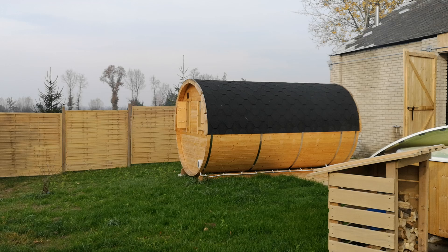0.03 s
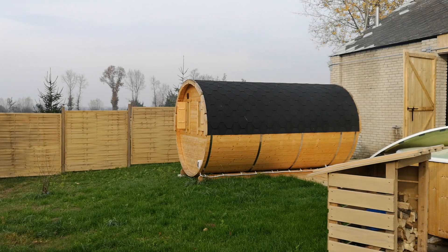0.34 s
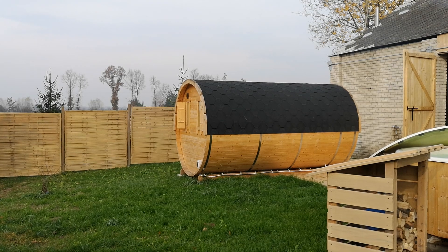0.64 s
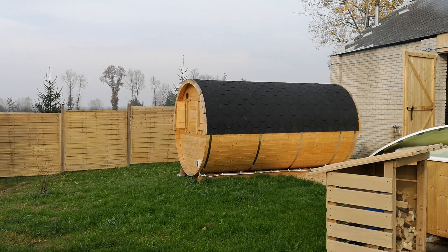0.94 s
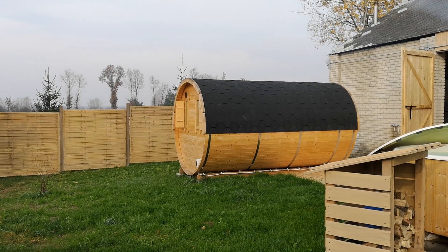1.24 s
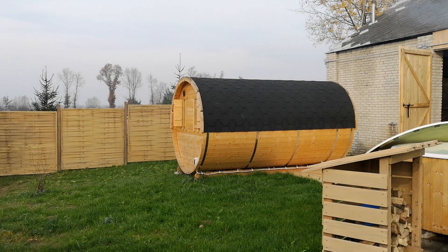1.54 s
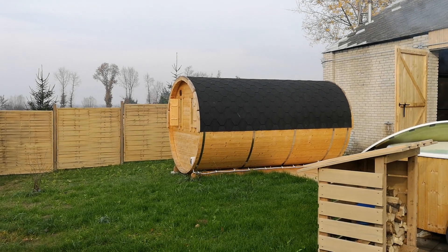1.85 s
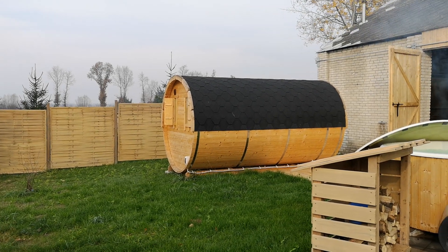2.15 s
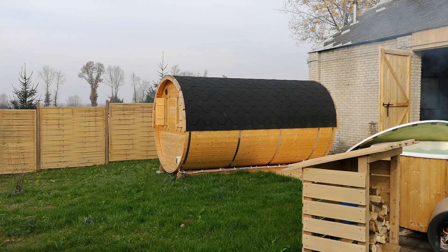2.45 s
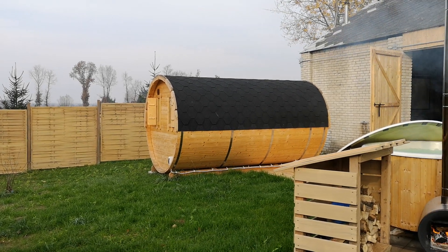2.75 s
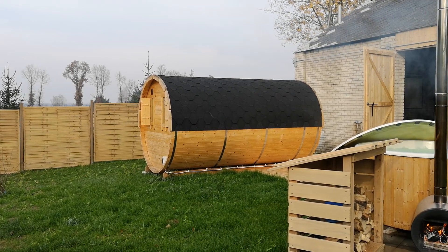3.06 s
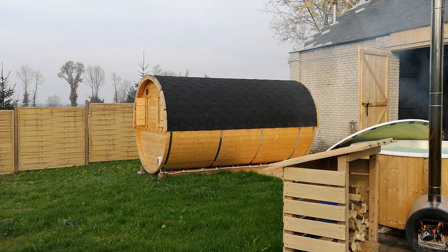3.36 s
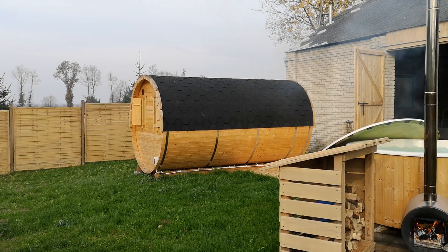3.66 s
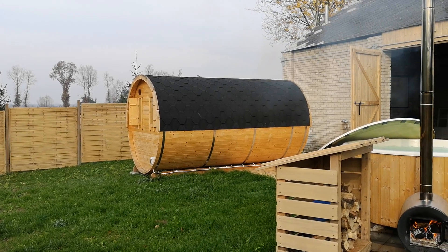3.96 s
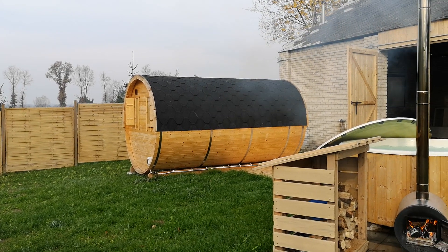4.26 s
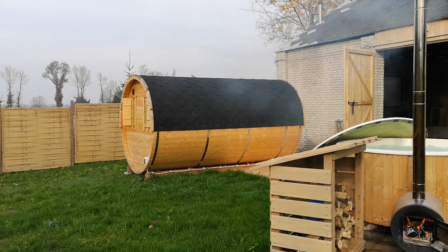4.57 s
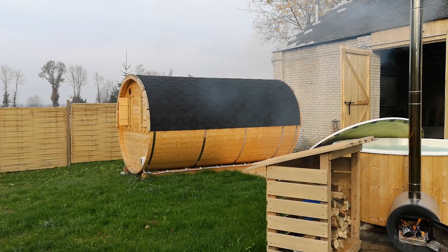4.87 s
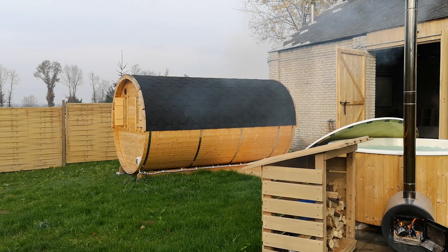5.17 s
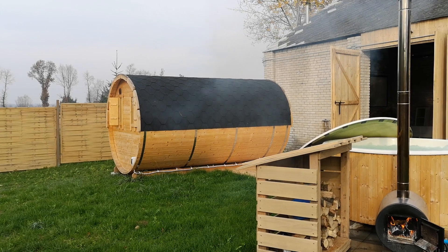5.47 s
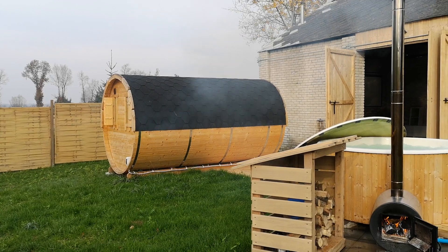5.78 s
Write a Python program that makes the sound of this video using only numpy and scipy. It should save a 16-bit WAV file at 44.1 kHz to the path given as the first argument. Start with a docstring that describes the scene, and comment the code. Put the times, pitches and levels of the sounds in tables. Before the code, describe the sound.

Bubbling water rumbles over a steady pump hum outdoors, with occasional small pops from a wood-burning stove.

```python
"""In a garden, a wood-fired hot tub runs a few metres off to the right.
Its pump hums and whines. Churned water and big pockets of air make the tub rumble in surges,
while small bubbles break and hiss at the surface. In the open stove, pockets of steam make the
logs tick and pop, one log splits, and the barn wall and the fence answer with echoes."""
import sys
import numpy as np
from scipy import signal
from scipy.fft import rfft, irfft
from scipy.io import wavfile
from scipy.ndimage import uniform_filter1d, map_coordinates

SR = 44100
rng = np.random.default_rng(int(sys.argv[2]) if len(sys.argv) > 2 else 0)


def unload_wav(signal):
    """Save mono or channel-first audio to the path in sys.argv[1] as 16-bit WAV at rate SR, clipped to [-1, 1]."""
    wavfile.write(
        sys.argv[1],
        SR,
        np.round(np.clip(np.atleast_2d(signal).T, -1, 1) * 32767).astype(np.int16),
    )


N = 257544
TIME = np.arange(N) / SR
FREQS = np.maximum(np.fft.rfftfreq(N, 1 / SR), 1)


def from_db(db):
    """Turn decibels into a number to multiply by."""
    return 10 ** (np.asarray(db) / 20)


def rms_one(x):
    """Scale a signal so that its average size (rms) is 1."""
    return x / np.sqrt(np.mean(x ** 2) + 1e-20)


def at_hz(points):
    """Join a table's points into a curve with a value at every frequency."""
    hz, value = np.transpose(points)
    return np.interp(np.log(FREQS), np.log(hz), value)


def drift(rate_hz):
    """A random wobble of size 1, mostly slower than the given rate."""
    return rms_one(irfft(rfft(rng.standard_normal(N)) / (1 + (FREQS / rate_hz) ** 2), N))


def resonance(hz, width_hz):
    """A hump of height 1 around one frequency."""
    return 1 / (1 + (2 * (FREQS - hz) / width_hz) ** 2)


def band_pass(x, edges_hz):
    """Keep the sound between a low and a high frequency."""
    return signal.sosfilt(signal.butter(2, edges_hz, "band", fs=SR, output="sos"), x)


def colour(x, tone, modes):
    """Give a noise a broad tone with resonances on top, then scale it to size 1."""
    lift_db = sum(db * resonance(hz, width) for hz, width, db in modes)
    return rms_one(irfft(rfft(x) * from_db(at_hz(tone) + lift_db), N))


def steady(x, seconds):
    """Even out the slow swells of a noise."""
    power = uniform_filter1d(np.mean(x ** 2, axis=0), int(seconds * SR), mode="wrap")
    return x / np.sqrt(power + 1e-9)


def two_ears(direct, scattered, lag_ms):
    """Direct sound reaches the right ear first; scattered sound differs between the ears."""
    # Each row: frequency in Hz, how alike the two sides are from 0 to 1.
    likeness = [(100, .999), (250, 0.99), (400, 0.73), (750, 0.64), (950, 0.52), (1250, 0.95), (1800, 0.57),
                (2400, 0.73), (3000, 0.14), (6000, 0.06), (12000, 0)]
    # Each row: frequency in Hz, how much louder the left side is in dB.
    balance = [(250, -0.08), (370, 2.5), (500, -0.5), (650, -2.5), (900, 0.5), (1200, 0), (1400, 8),
               (1650, 7), (1950, 5), (2400, -4.5), (3000, -4), (3900, 4.5), (5200, -1.5), (6500, -0.5),
               (7700, 9), (9000, -4.5), (11000, 0)]
    alike = at_hz(likeness)
    late = map_coordinates(direct, [(TIME - lag_ms / 1000) * SR], order=3)
    both = np.sqrt(alike) * rfft([late, direct]) + np.sqrt(1 - alike) * rfft(scattered)
    return irfft(both * from_db(at_hz(balance) * [[.5], [-.5]]), N)


def pump_hum(mains_hz=50):
    """The motor hums at multiples of the mains frequency, wavering with its load."""
    # Each row: multiple of the mains frequency, typical level in dB.
    harmonics = [(2, -52), (8, -92)]
    load = from_db(2 * drift(1.7))
    tones = [from_db(db) * np.sin(2 * np.pi * (k * mains_hz * TIME + rng.random()))
             for k, db in harmonics]
    return load * np.sqrt(2) * sum(tones)


def pump_whine():
    """The pump gives off a thin, unsteady whistle."""
    # In order: pitch in Hz, width in Hz, base level in dB.
    whistle = (3935, 60, -77)
    hz, width, db = whistle
    gain = from_db(db + drift(2.6))
    return gain * rms_one(irfft(rfft(rng.standard_normal((2, N))) * resonance(hz, width), N))


def ticks(per_s=3, level_db=-56, spread_db=3, low_hz=1900, high_hz=8000, octaves=0.45):
    """Tiny pockets of steam burst at random; gives extra rows for the pops in fire()."""
    chances = rng.random((60, 4))
    return [(when * TIME[-1], level_db + spread_db * (2 * size - 1),
             low_hz * (high_hz / low_hz) ** pitch, octaves)
            for luck, when, size, pitch in chances if luck < per_s * TIME[-1] / len(chances)]


def fire():
    """Each pocket of steam splits the wood with a crack that rattles briefly in the firebox."""
    # Each row: start in seconds, peak level in dB, pitch in Hz, width in octaves.
    pops = [(1.542, -41, 7700, 0.95), (2.235, -43, 2460, 0.41), (2.251, -47.5, 8100, 1.0),
            (3.028, -50.5, 5770, 0.32), (3.155, -42, 1900, 1.2), (4.179, -47, 2500, 0.26),
            (4.243, -48, 8000, 0.51), (4.281, -49.5, 8200, 0.39), (4.4333, -45, 5650, 0.32),
            (4.6135, -40.5, 7050, 0.25), (5.350, -47, 1390, .25)]
    out, t = np.zeros((2, N + SR)), TIME[:SR // 10]
    for start, peak_db, hz, octaves in pops + ticks():
        ring_s = 0.042 * (2000 / hz) ** 0.63  # higher pops die away sooner
        burst = rng.standard_normal((2, len(t))) * from_db(-60 * t / ring_s)
        crack = band_pass(burst, hz * 2 ** (octaves * np.array([-.5, .5])))
        at = int(start * SR)
        out[:, at:at + len(t)] += from_db(peak_db) * crack / np.abs(crack).max(axis=1, keepdims=True)
    return out[:, :N]


def splitting_log():
    """Fibres tear in two quick steps and set the log and the firebox mouth ringing."""
    # Each row: start in seconds, strength in dB, seconds to fade by 60 dB.
    steps = [(4.5604, -27, 0.014), (4.562, -32.5, 0.0073)]
    # Each row: ringing pitch in Hz, width in Hz, relative level in dB.
    modes = [(1750, 770, -8.5), (3000, 990, -6), (5650, 1100, -3.5), (7560, 1530, -0.5), (9030, 540, -7)]
    force = sum(from_db(db - 60 * np.maximum(TIME - start, 0) / fade_s) * (TIME >= start)
                for start, db, fade_s in steps)
    tearing = force * rng.standard_normal((2, N)) + 1e-18
    return sum(from_db(db) * np.sqrt(SR / 2 / width) * band_pass(tearing, [hz - width/2, hz + width/2])
               for hz, width, db in modes)


def garden_echoes(x, tail_db, fade_s, dull_hz):
    """The wall and fence send back two clear echoes and a thin, duller tail."""
    # Each row: delay in seconds, echo strength in dB.
    echoes = [(.0065, -25), (0.0127, -18.5)]
    t = TIME[:SR // 2]
    response = rng.standard_normal((2, len(t))) * from_db(-60 * t / fade_s) * (t > .003)
    response = signal.lfilter(*signal.butter(1, dull_hz, fs=SR), response)
    response *= from_db(tail_db) / np.linalg.norm(response, axis=1, keepdims=True)
    for delay, db in echoes:
        response[:, int(delay * SR)] += from_db(db)
    return signal.fftconvolve(x, response, axes=1)[:, :N]


def board_bounces(x, bounce_db, count=8):
    """Short bounces off the decking and woodshed make each side sound slightly hollow."""
    delays = (rng.uniform(0.0022, .014, (2, count)) * SR).astype(int)
    return np.array([side + from_db(bounce_db) * sum(np.roll(side, d) for d in lags)
                     for side, lags in zip(x, delays)])


def spray(lag_ms):
    """The finest bubbles merge into a faint hiss."""
    # Each row: frequency in Hz, relative level in dB.
    tone = [(300, -36), (2500, 0), (3800, -3.5), (4400, -8.5), (5300, 1.5), (6300, -3), (7500, -0.5),
            (8400, -4), (9200, -7.5), (10000, -14.5), (11200, -22.5), (15500, -28)]
    # Each row: resonance in Hz, width in Hz, boost in dB.
    modes = [(5070, 120, 1.3), (7350, 130, 2.5), (7860, 320, 7), (8430, 140, 3), (9200, 130, 3.5)]
    hiss = two_ears(rng.standard_normal(N), rng.standard_normal((2, N)), lag_ms)
    return colour(board_bounces(hiss, bounce_db=-12.5), tone, modes) * from_db(1.6 * drift(27))


def bubbles(per_s, low_hz, high_hz, cycles, spread_db, pitches):
    """Bubbles of many sizes are born at random, and each rings for some cycles."""
    strengths = from_db(spread_db * np.minimum(rng.exponential(1, N), 4)) * rng.choice([-1, 1], N)
    births = strengths * (rng.random(N) < per_s / SR)
    which_pitch, out = rng.integers(0, pitches, N), 0
    for k, hz in enumerate(np.geomspace(low_hz, high_hz, pitches)):
        w = 2 * np.pi * hz / SR  # angle turned per sample
        decay = from_db(-60 * hz / (cycles * SR))
        kicks = births * (which_pitch == k) + 1e-18
        ring = signal.lfilter([np.sin(w), -np.sin(w)], [1, -2 * decay * np.cos(w), decay ** 2], kicks)
        out = out + ring / np.sqrt(w)
    return rms_one(out)


def surface(lag_ms):
    """Small bubbles break over a wash of moving water, with a few clearer plips among them."""
    # Each row: frequency in Hz, relative level in dB.
    tone = [(60, -31.5), (340, -1.5), (490, 0.5), (620, -1), (760, 0.5), (920, -5), (1100, -3.5),
            (1400, -4.5), (2000, -5.5), (2900, -5.5), (3500, -13.5), (4400, -17.5), (8000, -22.5),
            (14000, -51)]
    # Each row: resonance of the water in Hz, width in Hz, boost in dB.
    modes = [(526, 56, 3.25), (696, 46, 4.2), (766, 29, 3.5), (1239, 55, 7.1), (1522, 19, 5),
             (1855, 98, 3.9), (1993, 94, 5.9), (2436, 71, 5.8)]
    layers = []  # one direct, two scattered
    for _ in range(3):
        wash = rng.standard_normal(N)
        fizz = bubbles(per_s=900, low_hz=423, high_hz=3210, cycles=12.5, spread_db=2.0, pitches=16)
        layers.append(wash + from_db(-12) * fizz)
    plips = bubbles(per_s=77, low_hz=1213, high_hz=3110, cycles=33, spread_db=3.5, pitches=14)
    heard = two_ears(layers[0] + from_db(-16.5) * plips, layers[1:], lag_ms)
    return colour(heard, tone, modes) * from_db(0.92 * drift(17))


def surges(build=0.67):
    """The water heaves up for the `build` share of each surge, then falls back; gives a boost in dB."""
    # Each row: time of the crest in seconds, boost in dB, length in seconds.
    heaves = [(1.0, 3, 1), (1.523, 3.5, 0.32), (1.786, 3.5, 0.65), (2.303, 4.5, 0.53), (2.76, 3.5, .3),
              (3.125, 5.5, 0.2), (3.65, 0.5, 0.5), (3.948, 4.5, 0.23), (4.199, 5, 0.11), (4.66, 2.5, 0.66),
              (5.217, 6, 0.3), (5.457, 1.5, 0.42), (5.777, 2, 0.28)]
    boost_db = 0
    for crest, db, length in heaves:
        corners = [crest - build * length, crest, crest + (1 - build) * length]
        boost_db += db * np.sin(np.pi / 2 * np.interp(TIME, corners, [0, 1, 0])) ** 2
    return boost_db


def rumble():
    """Swirling water and big pockets of air shake the tub at its low resonances."""
    # Each row: frequency in Hz, relative level in dB.
    tone = [(8, -16), (19, 1.5), (28, -4), (42, -3.5), (72, -4), (112, 0), (155, -0.5), (200, -5),
            (255, -9.5), (320, -14), (400, -24.5), (600, -56), (2000, -97.5)]
    # Each row: resonance of the tub in Hz, width in Hz, boost in dB.
    modes = [(52.9, 10, 11), (79.6, 3.7, 8), (102, 13, 1.5), (223.3, 18.6, 9), (269.7, 8.3, 6)]
    churn = two_ears(rng.standard_normal(N), rng.standard_normal((2, N)), lag_ms=0.033)
    return steady(colour(churn, tone, modes), seconds=.15)


def scene():
    """Water, pump and stove play together as the listener turns toward the tub."""
    # Each row: time in seconds, lag of the left ear in milliseconds, change to the whine in dB.
    turn = [(0.3, 0.19, -31), (1.8, 0.17, -39), (2.5, 0.15, -1.5), (4.4, 0.11, -2), (5.8, 0.079, 2)]
    times, lags, whine_changes = np.transpose(turn)
    lag_ms, whine_db = np.interp(TIME, times, lags), np.interp(TIME, times, whine_changes)
    surge_db = surges()
    # The surface follows about half of each surge and slowly grows louder.
    surface_db = -56.5 + 0.49 * surge_db + 0.1 * (TIME - TIME.mean())
    spray_db = -67.5 + .5 * (surface_db - surface_db.mean())  # a livelier surface throws more spray
    water = from_db(-45 + surge_db) * rumble()
    water += from_db(surface_db) * surface(lag_ms)
    water += from_db(spray_db) * spray(lag_ms)
    pump = pump_hum() + from_db(whine_db) * pump_whine()
    stove = fire() + splitting_log()
    return water + pump + stove + garden_echoes(stove, tail_db=-14.5, fade_s=0.29, dull_hz=4430)


def record(dry):
    """Add a faint hiss, begin with a moment of silence and cut the highest treble."""
    hiss_db, start_s, cutoff_hz = -78, .3315, 15750
    hiss = from_db(hiss_db) * rng.standard_normal((2, N))
    fade_in = np.clip((TIME - start_s) / .001, 0, 1)
    low_pass = signal.ellip(12, .1, 80, cutoff_hz, fs=SR, output="sos")
    return signal.sosfilt(low_pass, (dry + hiss) * fade_in)


dry = scene()
out = record(dry)
unload_wav(out)
```